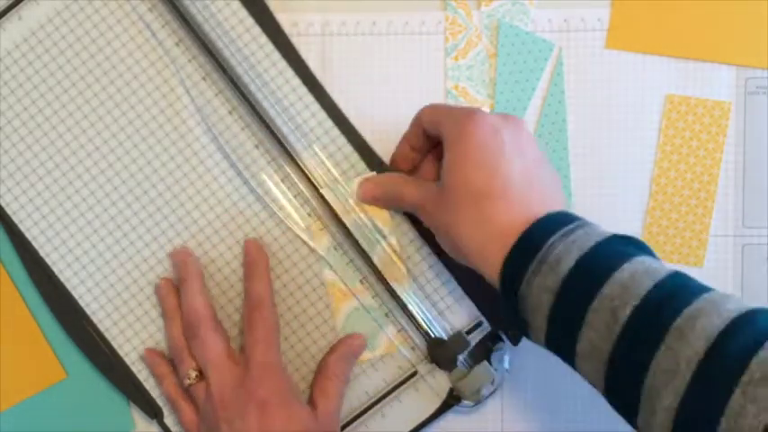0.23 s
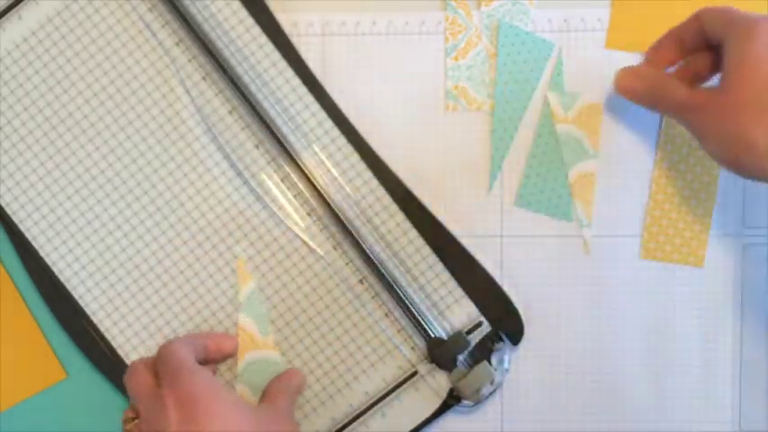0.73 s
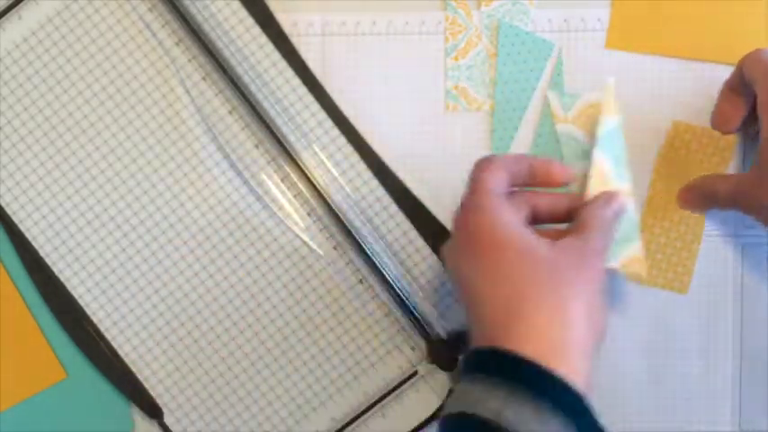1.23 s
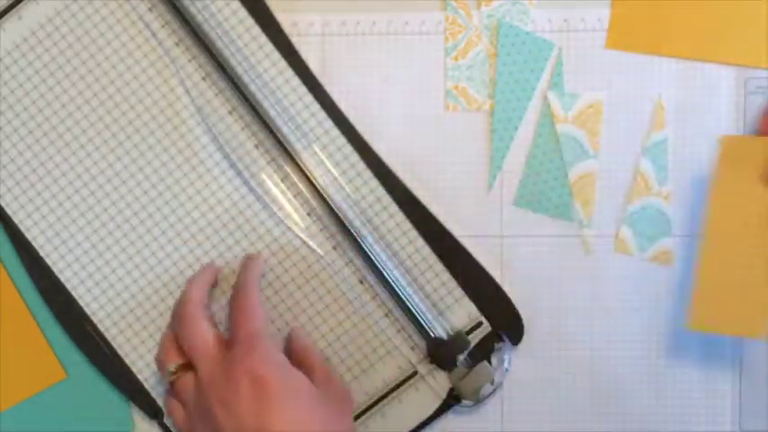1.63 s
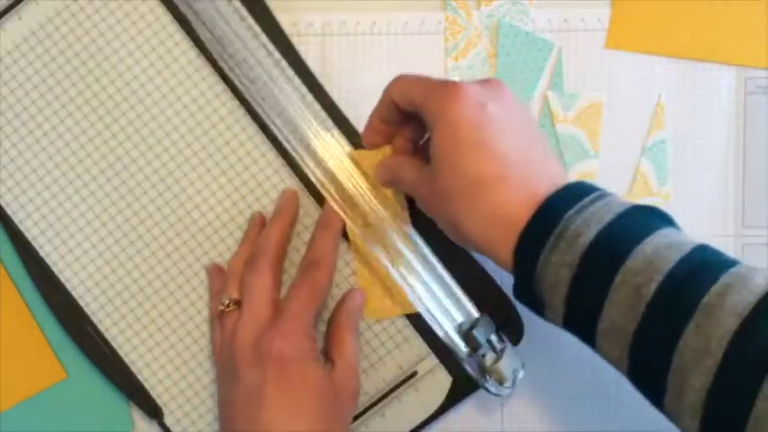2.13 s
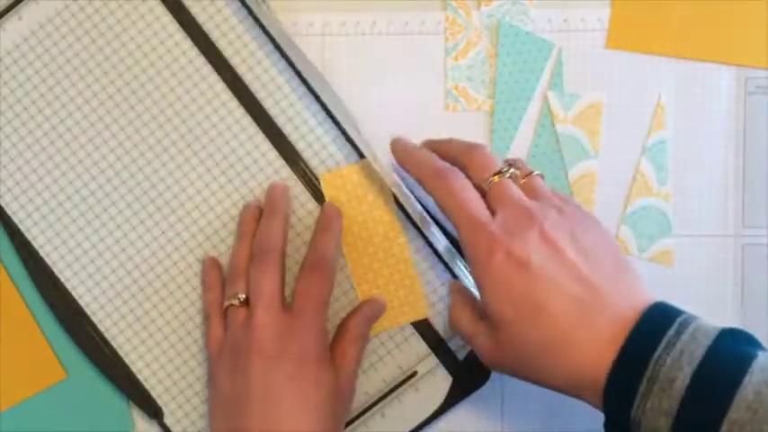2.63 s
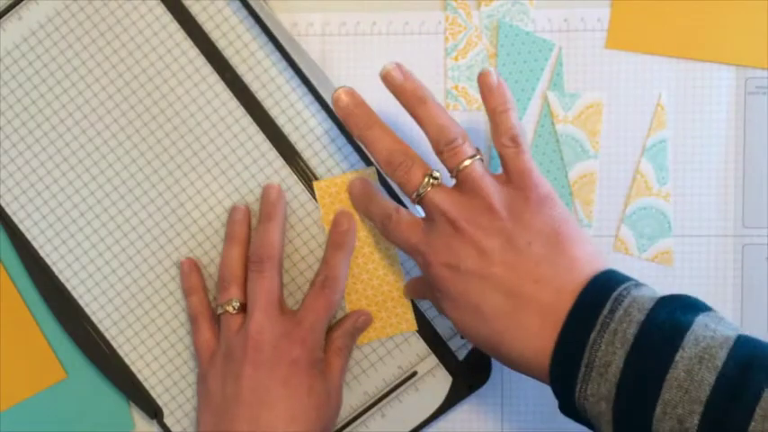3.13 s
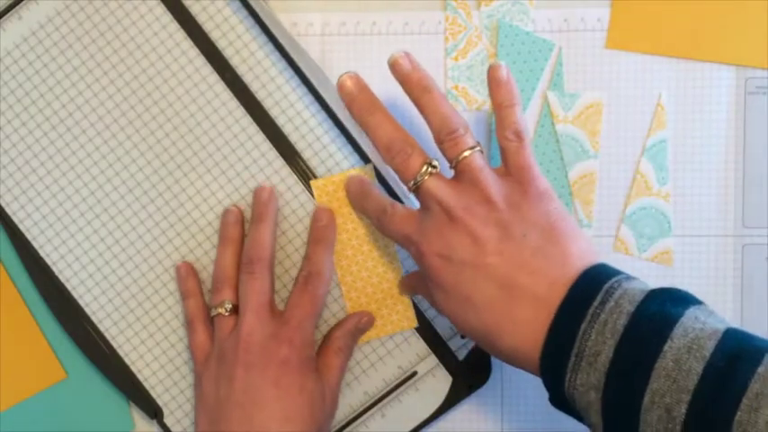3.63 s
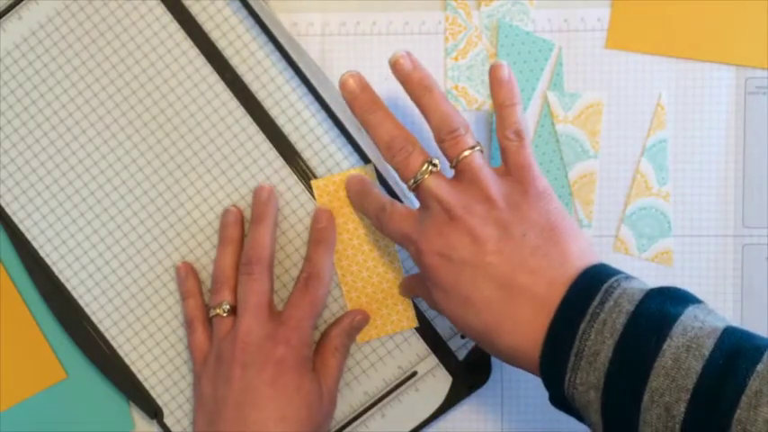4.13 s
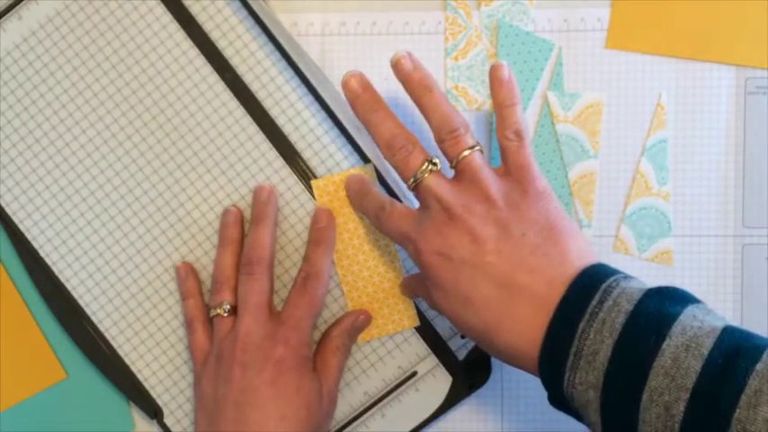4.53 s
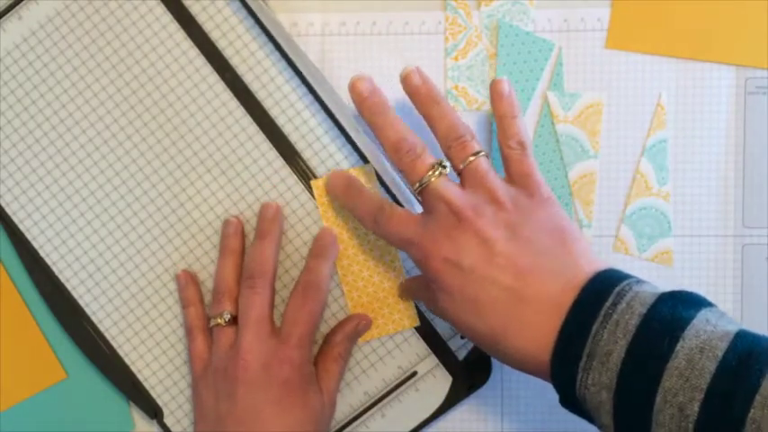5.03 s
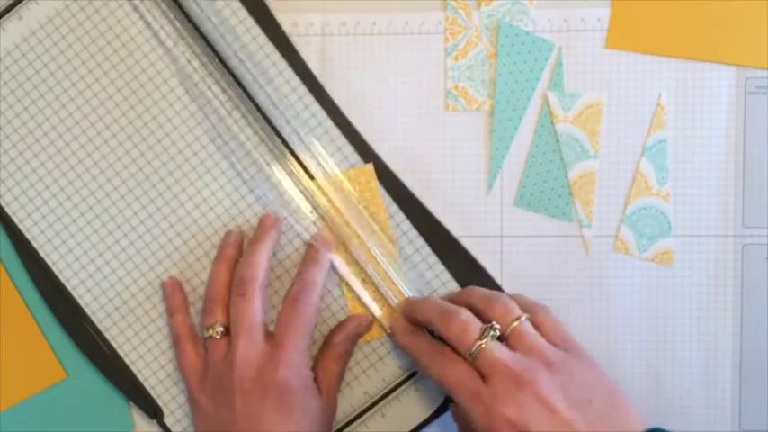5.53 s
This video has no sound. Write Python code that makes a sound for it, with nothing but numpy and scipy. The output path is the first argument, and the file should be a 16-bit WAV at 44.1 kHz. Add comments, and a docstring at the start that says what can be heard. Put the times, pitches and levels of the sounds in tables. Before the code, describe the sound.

Hands shift paper on a sliding trimmer: sharp plastic clicks, soft low table knocks, bright card scrapes, near stillness, then a final rattle.

```python
"""Hands grip a plastic paper trimmer on a craft table from 0 s: swelling noise through its and the table's modes.
Clacks (noise cracks, ringing plastic) and thuds (decaying sines) start at once, card slides (hiss) at 0.1 s.
Edge snaps (bare cracks) join at 0.2 s; long drags at 0.9 and 1.9 s hiss and sing in a narrow noise band.
After a sparser stretch from 2.9 s, clacks and thuds crowd again near 5.3 to 5.7 s.
Room rumble and hiss lie behind throughout; their level dips and recovers, most sharply near 1.46 s."""
import sys
import numpy as np
from scipy import signal
from scipy.fft import rfft, irfft, next_fast_len
from scipy.io import wavfile
from scipy.ndimage import uniform_filter1d, map_coordinates

SR = 44100
rng = np.random.default_rng(int(sys.argv[2]) if len(sys.argv) > 2 else 0)


def inscribe(sig):
    """Save sig as 16-bit PCM at rate SR to the path in sys.argv[1].

    A 1-D sig is mono; a 2-D sig holds one channel per row.
    Samples are clipped to [-1, 1] before scaling.
    """
    pcm = np.round(np.clip(np.atleast_2d(sig).T, -1, 1) * 32767)
    wavfile.write(sys.argv[1], SR, pcm.astype(np.int16))


N = 254898
TOP_HZ = 15600


def amp(db):
    """Amplitude ratio of a level in dB."""
    return 10 ** (np.asarray(db) / 20)


def unit(x):
    """x at unit RMS."""
    return x / np.sqrt(np.mean(x ** 2) + 1e-20)


def curves(tables):
    """One value per sample for each column, and a gate that is shut between the tables."""
    rows = np.vstack(tables)
    t = np.arange(N) / SR
    active = sum((t >= r[0][0]) & (t <= r[-1][0]) for r in tables) > 0
    columns = [np.interp(t, rows[:, 0], c) for c in rows.T[1:]]
    return columns, uniform_filter1d(1. * active, size=600)


def wobble(rate_hz):
    """Smooth random curve, rate_hz knots a second."""
    knots = rng.standard_normal(int(N * rate_hz / SR) + 4)
    return map_coordinates(knots, [np.arange(N) * rate_hz / SR])


def filtered(x, response):
    """x times a response of frequency, real or complex."""
    m = next_fast_len(len(x) + SR // 2)
    f = np.fft.rfftfreq(m, 1 / SR) + 1  # +1 keeps f off zero
    return irfft(rfft(x, m) * response(f), m)[:len(x)]


def place(out, start_s, burst):
    """Add a burst to out at start_s."""
    out[round(start_s * SR):][:len(burst)] += burst


def fibres(grain_db, rate_hz):
    """Noise from fibres that catch and let go in uneven bursts."""
    return unit(amp(grain_db * wobble(rate_hz)) * rng.standard_normal(N))


# background level: t/s, level/dB
BACKGROUND_LEVEL = [(0, -41.5), (.2, -50), (.55, -41.5), (.62, -46.5), (1.4, -42), (1.46, -64.5),
                    (1.58, -54.5), (1.7, -53), (1.95, -43), (2.75, -49), (3.1, -42), (3.6, -41.5),
                    (5.25, -41.5), (5.4, -44.5), (5.78, -44.5)]
# room noise colour before scaling: f/Hz, relative density/dB
ROOM_COLOUR = [(15, -40), (25, -21), (59, -2.5), (133, 0.5), (233, -4.5), (359, -11.5), (509, -17.5),
               (804, -20.5), (1200, -23), (1900, -26), (3930, -27.5), (14300, -33.5), (15500, -36)]
HISS_DIP_SHARE = 0.82  # share of the level dips that the hiss follows


def background():
    """Room rumble that swells unevenly, and a smooth hiss."""
    f, colour_db = np.transpose(ROOM_COLOUR)
    colour = lambda hz: amp(np.interp(np.log(hz), np.log(f), colour_db))
    air = unit(filtered(rng.standard_normal(N), colour))
    rumble = filtered(air, lambda hz: 1 / (1 + (hz / 500) ** 2))
    hiss = air - rumble
    level_db = curves([BACKGROUND_LEVEL])[0][0]
    top_db = level_db.max()
    dip_db = level_db - top_db
    rumble = rumble * amp(dip_db + 0.92 * wobble(12))
    return amp(top_db) * (amp(HISS_DIP_SHARE * dip_db) * hiss + rumble)


def resonances(modes):
    """Causal response of a sum of damped modes with alternating signs."""
    def response(f):
        total = 0
        for k, (hz, db, t60_s) in enumerate(modes):
            width_hz = np.log(1000) / np.pi / t60_s
            damping = 1j * f * width_hz
            total = total + (-1) ** k * amp(db) * damping / (hz * hz - f * f + damping)
        return total
    return response


# table-top modes, t60 before stretching or damping: f/Hz, level/dB, t60/s
TABLE_MODES = [(99.4, 2, 0.055), (132.4, 4, 0.071), (192.6, -2, 0.13), (267, -3.5, 0.055),
               (351.4, -4.5, 0.064), (437.3, -5.5, 0.057)]
# trimmer modes, t60 before damping by hands: f/Hz, level/dB, t60/s
TRIMMER_MODES = [(577, 2, 0.022), (703, 2, 0.02), (858, -3.5, 0.035), (953, -2.5, 0.045), (1097, -5, 0.025),
                 (1520, -3, 0.022), (1940, 4, 0.02), (2360, -3, 0.02)]
# grips: start t/s, strongest t/s, end t/s, scuff level/dB, shake level/dB
GRIP_LEVELS = [(0, 0.25, 0.4, -49, -35.5), (0.36, 0.411, 0.46, -44.5, -39), (0.5, 0.586, 0.95, -56, -39.5),
               (0.805, 1.077, 1.22, -50, -34), (1.297, 1.423, 1.5, -48, -50.5),
               (1.693, 1.754, 1.8, -55, -34), (1.897, 2.003, 2.15, -49, -34),
               (2.157, 2.257, 2.4, -47.5, -32), (2.39, 2.634, 2.875, -53, -32.5),
               (2.883, 2.98, 2.93, -51, -51), (3.08, 3.16, 3.34, -52, -48),
               (3.307, 3.402, 3.62, -65, -42.5), (4.3, 4.375, 4.45, -61, -45.5),
               (4.513, 4.67, 4.77, -56.5, -42.5), (4.78, 4.83, 5.1, -54, -46),
               (5.219, 5.327, 5.53, -58, -33.5), (5.443, 5.53, 5.93, -48, -36),
               (5.686, 5.742, 5.8, -41, -30)]
GRIP_EDGE_DB = -14


def hands():
    """Each grip scuffs the trimmer and shakes the table; the hands' weight damps both."""
    grips = []
    for start, top, end, scuff, shake in GRIP_LEVELS:
        edge = (scuff + GRIP_EDGE_DB, shake + GRIP_EDGE_DB)
        grips.append([(start, *edge), (top, scuff, shake), (end, *edge)])
    (scuff_db, shake_db), active = curves(grips)
    wide = [(hz, db - 3 * np.log2(hz / 900), t60_s * 0.27) for hz, db, t60_s in TRIMMER_MODES]
    scuff = amp(scuff_db + 1.5 * wobble(30)) * unit(filtered(fibres(2.5, 200), resonances(wide)))
    held = [(hz, db, t60_s * 0.36) for hz, db, t60_s in TABLE_MODES]
    shake = amp(shake_db) * unit(filtered(fibres(3.5, 40), resonances(held)))
    return active * (scuff + shake)


def ring(modes, t, stretch=1):
    """Decaying modes at new strengths and phases for one blow."""
    draw = rng.random((len(modes), 2))
    total = 0
    for (hz, db, t60_s), (strength, phase) in zip(modes, draw):
        fade = amp(db + 5 * (strength - .5) - 60 * t / (t60_s * stretch))
        total = total + fade * np.sin(2 * np.pi * (hz * t + phase))
    return total


def crack(t, db, hz, air_db, t60_s):
    """Noise burst round its centre; longer bursts also start more softly."""
    noise = rng.standard_normal(len(t))

    def colour(f):
        peak = np.exp(-.5 * (np.log2(f / hz) / 0.23) ** 2) + 0.49
        return peak / (1 + (1800 / f) ** 4) / (1 + (f / 9000) ** 6)

    air = unit(filtered(noise, lambda f: 1 / (1 + (9000 / f) ** 8) / f))
    fade = amp(-60 * t / t60_s) * (1 - np.exp(-t / (0.039 * t60_s)))
    return amp(db - 6.0) * fade * (unit(filtered(noise, colour)) + amp(air_db - 14) * air)


# clacks, levels before fixed offsets:
# t/s, crack level/dB, centre f/Hz, air level/dB, crack t60/s, body level/dB, body centre f/Hz
TRIMMER_CLACKS = [(0.0201, -26.5, 2600, -28, 0.024, -40, 545), (0.0962, -34.5, 3450, -16, .03, -47.5, 579),
                  (0.1875, -30, 2780, -15, .023, -33.5, 1870), (0.2364, -18, 6740, 5, 0.033, -32, 1330),
                  (0.2514, -31.5, 2820, -20, .04, -38, 937), (0.5432, -10.5, 2580, 8, 0.019, -25.5, 1040),
                  (0.9373, -30, 3180, 19, .013, -41.5, 890), (1.7095, -14, 1890, -11, 0.016, -23, 610),
                  (1.8078, -29.5, 5460, 0, 0.027, -36, 1950), (1.8502, -32.5, 4340, -6, 0.028, -41.5, 888),
                  (1.8891, -35, 2470, -18, 0.015, -51, 872), (1.9066, -32, 2200, -17, .015, -40, 1600),
                  (2.1865, -17, 2000, -20, 0.019, -39, 600), (2.1949, -14, 5000, 6, 0.033, -27, 1550),
                  (2.2144, -23, 2320, -25, 0.04, -31, 1800), (2.4538, -46, 2550, -18, .024, -44.5, 930),
                  (2.5566, -31.5, 2600, -26, .045, -36, 600), (2.597, -24, 2820, -34, 0.071, -35.5, 1800),
                  (2.6125, -19.5, 4320, -26, 0.029, -32.5, 585),
                  (2.6254, -25.5, 2200, -27, 0.026, -33, 1900), (2.6449, -22, 2950, -34, .048, -34, 690),
                  (2.6594, -31, 2500, -14, 0.028, -35, 576), (5.258, -50, 2500, -30, .02, -40.5, 600),
                  (5.2754, -23, 2520, -35, .014, -29.5, 533), (5.2834, -20.5, 2970, -61, 0.018, -36, 950),
                  (5.3108, -34, 2400, -26, .027, -40, 950), (5.3664, -45, 2510, -16, .022, -51, 1900),
                  (5.471, -21, 5800, -22, .02, -45, 552), (5.4814, -29, 2200, -26, .012, -35, 584),
                  (5.4909, -14.5, 7400, -30, 0.023, -21, 605), (5.5044, -10, 6100, -37, 0.011, -26, 870),
                  (5.5254, -29, 2820, -30, 0.033, -38, 875), (5.5358, -13, 6440, -27, 0.016, -25, 910),
                  (5.7069, -12.5, 2100, -34, 0.032, -19, 1150)]


def clacks():
    """A crack, plus trimmer modes and rattle, strongest near the body centre."""
    out, t = np.zeros(N + SR), np.arange(SR // 8) / SR
    for start_s, *burst, body_db, body_hz in TRIMMER_CLACKS:
        focus_db = lambda f: -6 * np.log2(f / body_hz) ** 2
        near = [(hz, db + focus_db(hz), t60_s) for hz, db, t60_s in TRIMMER_MODES]

        def band(f):
            notch = 1 - 0.49 / (1 + ((f - 1300) / 220) ** 2)
            return amp(0.2 * focus_db(f)) / (1 + (f / 2500) ** 6) / (1 + (500 / f) ** 4) * notch

        rattle = unit(filtered(rng.standard_normal(len(t)), band)) * amp(-60 * t / 0.06)
        body = (ring(near, t) + 0.58 * rattle) * (1 - np.exp(-t / 0.0019))
        place(out, start_s, crack(t, *burst) + amp(body_db + 6) * body)
    return out[:N]


def walls(x):
    """Short, dull room answer: x convolved with decaying noise, 200 samples late."""
    t = np.arange(SR // 4) / SR
    decay = rng.standard_normal(len(t)) * amp(-60 * t / 0.11)
    tail = filtered(decay, lambda f: 1 / (1 + f / 3000))
    return signal.fftconvolve(x, np.pad(tail / np.linalg.norm(tail), (200, 0)))[:N]


# table knocks, levels before fixed offsets: t/s, level/dB, f/Hz, upper-mode level/dB, t60/s
TABLE_THUDS = [(0.021, -30, 136, -11, 0.24), (0.188, -16.5, 103, -6.5, 0.14), (0.232, -6, 152, -23, 0.12),
               (0.308, -24, 139, -30, 0.23), (0.548, -16, 137, -7, 0.14), (0.938, -15, 164, -1, 0.081),
               (1.028, -22.5, 151.7, -11.5, 0.3), (1.076, -15, 206, -6.5, 0.096),
               (1.129, -26, 229, -9, 0.13), (1.709, -10.5, 100, -10.5, 0.085),
               (1.813, -14.5, 104, -12.5, 0.12), (1.908, -21, 124, -20, 0.07),
               (2.003, -16.5, 111, -15.5, 0.21), (2.188, -10, 131, -5.5, 0.095),
               (2.209, -10.5, 97, -5.5, 0.11), (2.337, -22.5, 110, -41, 0.3),
               (2.465, -18.5, 105, -20, 0.23), (2.553, -15, 91.5, -9, 0.23),
               (2.597, -14, 115.7, -12.5, 0.39), (2.643, -17, 89, -7, 0.17), (2.675, -10, 99, -24, 0.1),
               (5.275, -13, 109.1, -9.5, 0.21), (5.367, -21.5, 112, -7, 0.071),
               (5.418, -22, 133, -15, 0.13), (5.475, -15.5, 96, -12, 0.18), (5.499, -14.5, 350, -3.5, 0.11),
               (5.534, -19, 135, -7.5, 0.2), (5.701, -18, 141, -7.5, 0.27)]


def thuds():
    """Soft push: the spot's own tone and the table's modes build over a few ms, then decay."""
    out, t = np.zeros(N + SR), np.arange(SR // 3) / SR
    for start_s, db, hz, upper_db, t60_s in TABLE_THUDS:
        own = amp(-60 * t / t60_s) * np.sin(2 * np.pi * hz * t)
        lower = 0.49 * ring(TABLE_MODES[:3], t, t60_s / 0.089)
        upper = amp(upper_db + 7.5) * ring(TABLE_MODES[3:], t, t60_s / 0.097)
        place(out, start_s, amp(db - 4) * (own + lower + upper) * (1 - np.exp(-t / 0.0033)))
    return out[:N]


def stroke(start, length, first_db, last_db, rise, fall, edge_db):
    """(t/s, level/dB) corners of a stroke: rise, glide, fall."""
    end = start + length
    return [(start, first_db + edge_db), (start + rise, first_db),
            (end - fall, last_db), (end, last_db + edge_db)]


PATCHY_DB = 2  # RMS unevenness over pitch and time


def hump(x, centre_hz, octaves, skirt_db):
    """x through a patchy resonance of moving centre and spread, its gain levelled per frame."""
    hz, t, z = signal.stft(x, SR, nperseg=256)
    now, hz = np.minimum((t * SR).astype(int), N - 1), hz[:, None] + 1
    skirt = amp(skirt_db[now]) / (1 + (2300 / hz) ** 4) / (1 + (hz / 9000) ** 4)
    patches = uniform_filter1d(rng.standard_normal(z.shape), size=4, axis=0)
    patches = unit(uniform_filter1d(patches, size=7, axis=1))
    distance = np.log2(hz / centre_hz[now]) / np.maximum(octaves[now], .03)
    gain = np.exp(-.5 * distance ** 2) + skirt
    gain /= np.sqrt(np.mean(gain[hz[:, 0] < TOP_HZ] ** 2, axis=0))
    shaped = z * gain * amp(PATCHY_DB * patches)
    return unit(signal.istft(shaped, SR, nperseg=256)[1][:N])


# short card slides:
# start t/s, length/s, first level/dB, last level/dB, centre f/Hz, spread/octaves, air level/dB
SHORT_SLIDES = [(0.096, 0.2, -46.5, -54, 7460, 0.6, -14), (0.318, 0.12, -48.5, -51, 9800, 0.53, -10),
                (0.449, 0.1, -44.5, -39, 9500, 0.68, -15), (0.747, 0.15, -50, -51, 8000, 0.3, -5),
                (1.455, 0.11, -46, -47.5, 7040, 0.27, -15), (2.327, 0.072, -58, -48.5, 8140, 0.29, -9),
                (2.549, 0.19, -57, -50.5, 5630, 0.79, -5), (2.85, 0.18, -57, -57, 8350, 0.4, -10),
                (3.083, 0.072, -50, -48, 7680, 0.54, -24), (3.27, 0.06, -50, -50, 9000, .45, -11),
                (3.334, 0.093, -50, -48.5, 8300, 0.5, -7), (3.53, 0.12, -57, -62, 8000, .55, -3),
                (4.563, 0.12, -55.5, -57, 5800, .4, -15), (4.812, .14, -52, -50, 8300, .37, -10)]
# two long drags of a strip, a list each: t/s, level/dB, centre f/Hz, spread/octaves
LONG_DRAGS = [
    [(.9, -51, 8600, 0.31), (.99, -42, 6500, .48), (1.07, -46, 6300, 0.57), (1.18, -42, 7000, 0.43),
     (1.24, -50, 7000, 0.43), (1.275, -37, 6200, 0.77), (1.335, -38, 6000, .3), (1.385, -24.5, 6850, .4),
     (1.405, -32, 6450, .42), (1.432, -29.5, 6340, 0.39), (1.447, -48, 6500, .48)],
    [(1.87, -73, 5000, 0.41), (1.958, -60, 6250, 0.25), (2.05, -49.5, 6800, 0.42), (2.132, -38, 5170, 0.54),
     (2.184, -39, 5650, 0.37), (2.24, -43.5, 5040, .42), (2.318, -62, 6480, 0.53)],
]
SLIDE_RISE_S, SLIDE_FALL_S, SLIDE_EDGE_DB = 0.03, 0.028, -12.5
DRAG_AIR_DB = -11  # relative to the drag's hiss


def sliding():
    """Card hisses on the mat in uneven catches; a broader hiss has a stronger skirt."""
    tables = [[(*p, DRAG_AIR_DB) for p in drag] for drag in LONG_DRAGS]
    for row in SHORT_SLIDES:
        corners = stroke(*row[:4], SLIDE_RISE_S, SLIDE_FALL_S, SLIDE_EDGE_DB)
        tables.append([(*p, *row[4:]) for p in corners])
    (hiss_db, centre_hz, octaves, air_db), active = curves(sorted(tables))
    grain = fibres(1.66, 700)
    air = unit(filtered(grain, lambda f: 1 / (1 + (10000 / f) ** 8) / f))
    body = hump(grain, centre_hz, octaves, -15 + 17 * octaves)
    return active * amp(hiss_db + 1.2 * wobble(45)) * (body + amp(air_db) * air)


# card-edge snaps, levels before fixed offsets: t/s, level/dB, centre f/Hz, air level/dB, t60/s
EDGE_SNAPS = [(0.2064, -29, 4040, 1, 0.046), (0.784, -17.5, 6030, -15, 0.014),
              (0.7966, -18.5, 7000, -17, 0.015), (0.9207, -24, 5900, -20, 0.013),
              (1.0016, -12.5, 3170, 4, 0.023), (1.0914, -23, 6700, 14, 0.023),
              (1.4226, -15, 7980, -15, 0.014), (1.4294, -6.5, 4600, -10, 0.023),
              (1.44, 0.5, 5500, -4, 0.0044), (1.457, -28, 7600, 5, .012), (1.9625, -30.5, 6190, -20, 0.018),
              (1.9925, -35, 2890, -20, .013), (2.1075, -21, 3190, -9, 0.017),
              (2.134, -13.5, 4700, -20, 0.017), (2.2702, -19.5, 4370, 3, 0.025),
              (2.2815, -20.5, 7650, -18, .02), (2.3334, -29.5, 6500, -19, .012),
              (2.9204, -28, 8800, 11, 0.016), (3.2136, -36, 8000, 14, 0.017),
              (4.799, -27.5, 2670, 3, 0.028)]


def snaps():
    """Card edges snap: bare cracks, no body."""
    out, t = np.zeros(N + SR), np.arange(SR // 8) / SR
    for start_s, *burst in EDGE_SNAPS:
        place(out, start_s, crack(t, *burst))
    return out[:N]


# singing card edge: start t/s, length/s, first level/dB, last level/dB, first f/Hz, last f/Hz
EDGE_SINGING = [(0.934, 0.023, -30.5, -42, 3180, 3180), (0.976, 0.029, -33.5, -36, 3180, 3180),
                (1.017, 0.086, -30, -33, 3180, 3170), (1.09, 0.19, -43, -53, 3100, 3120),
                (1.255, 0.054, -39, -47, 3070, 4070), (1.327, 0.035, -34, -31, 4870, 6300),
                (1.366, 0.097, -36.5, -41, 3100, 2820), (2.061, 0.14, -45, -37.5, 3170, 3230)]
SING_EDGE_S, SING_EDGE_DB = 0.011, -17


def singing():
    """The dragged edge rings in a narrow, broken band; its pitch may glide within a stroke."""
    strokes = []
    for *row, first_hz, last_hz in EDGE_SINGING:
        start, length = row[:2]
        slope = (last_hz - first_hz) / length
        corners = stroke(*row, SING_EDGE_S, SING_EDGE_S, SING_EDGE_DB)
        strokes.append([(s, db, first_hz + slope * (s - start)) for s, db in corners])
    (level_db, hz), active = curves(strokes)
    band = hump(fibres(0.9, 300), hz, np.full(N, .08), np.full(N, -12.5))
    return active * amp(level_db + 2.6 * wobble(60.03)) * band


def scene():
    """Sum of all layers; only clacks and snaps excite the walls."""
    hits = clacks() + snaps()
    room = amp(-14.0) * walls(hits)
    return (background() + hands() + hits + room + thuds() + sliding() + singing())[None]


def record(dry):
    """Band limit: nothing passes from TOP_HZ up."""
    return filtered(dry[0], lambda hz: hz < TOP_HZ)[None]


dry = scene()
out = record(dry)
inscribe(out)
```